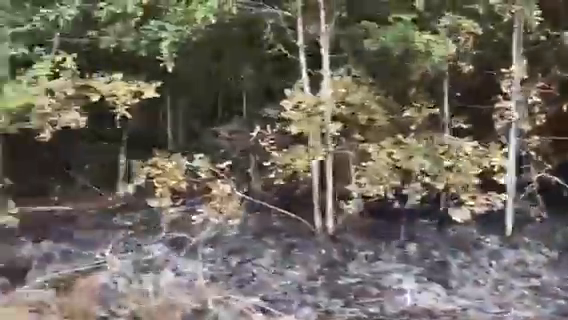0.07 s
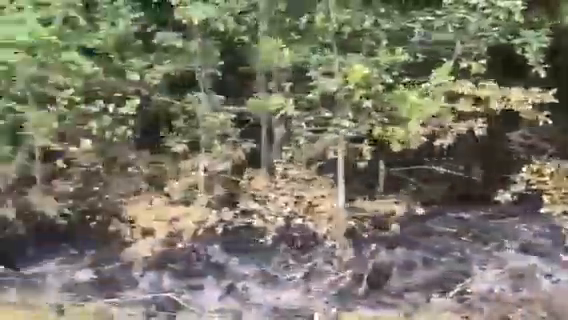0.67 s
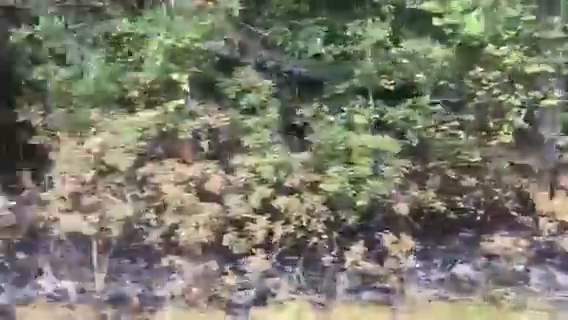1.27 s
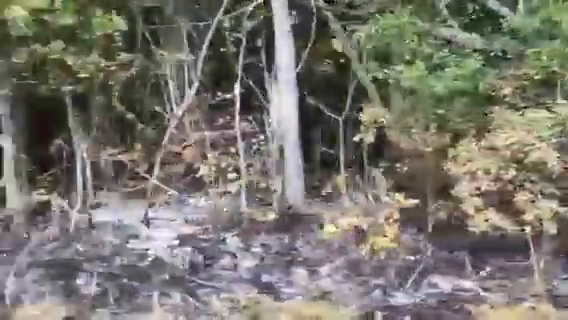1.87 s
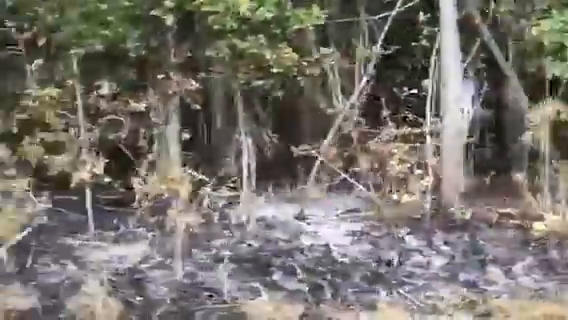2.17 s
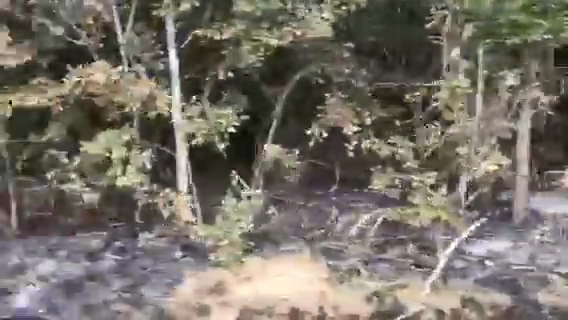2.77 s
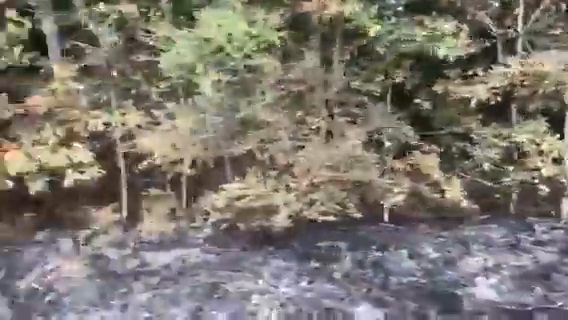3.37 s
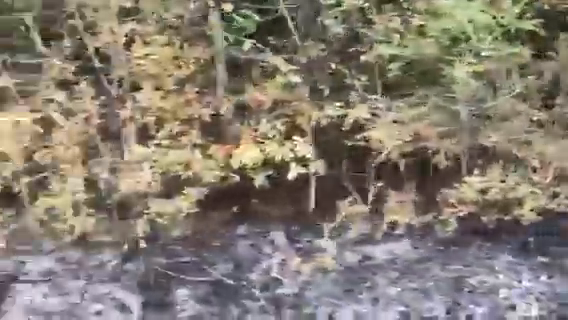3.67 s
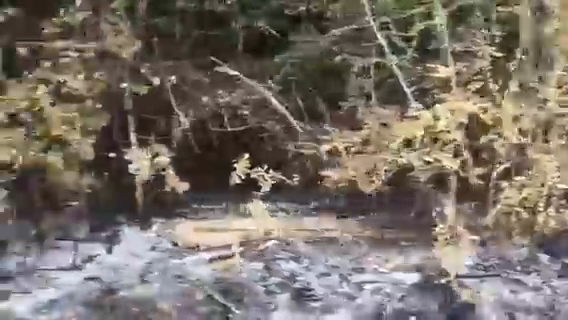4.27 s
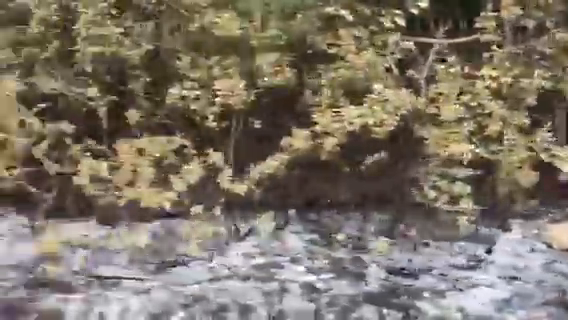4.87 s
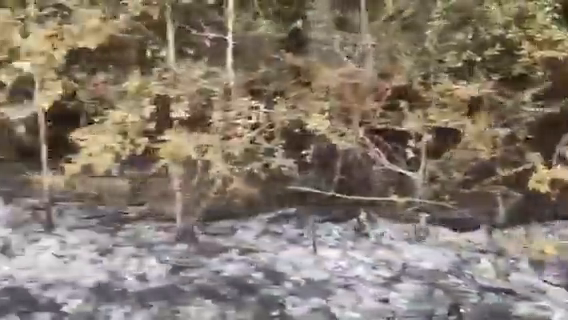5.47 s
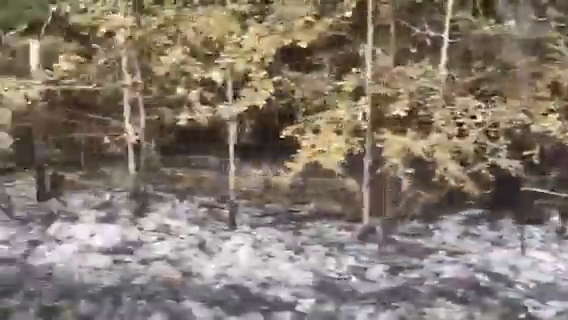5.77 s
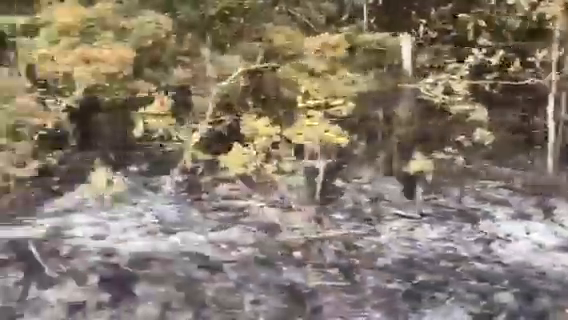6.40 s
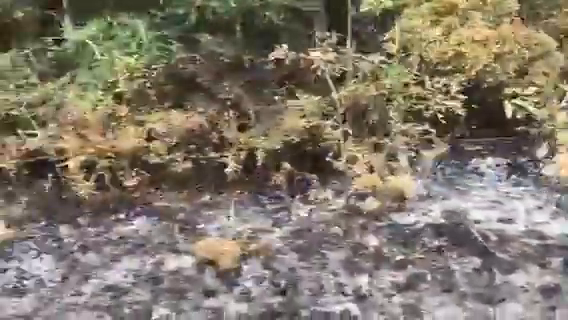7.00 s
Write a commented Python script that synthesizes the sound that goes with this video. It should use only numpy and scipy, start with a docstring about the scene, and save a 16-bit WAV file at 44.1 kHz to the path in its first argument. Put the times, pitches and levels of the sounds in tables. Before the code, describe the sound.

For about seven seconds we are inside a moving vehicle, the microphone beside an open side window. A deep road rumble and a steady rush of tyres and air run from start to finish, with slipstream throbbing unevenly in the cabin. The engine gains a little speed over the first two seconds, then eases into a low, booming drone. Gusts hit the microphone with dull thumps, in a strong cluster between 0.5 and 1 second, again near 1.7, and several times from 2.3 to 3.2 seconds. Around 2.4 seconds something softly brushes the microphone. The wind dips briefly at 4 seconds, swells at about 4.4, and thumps repeatedly from 5 to 6.2 seconds before easing off near the end. A faint, steady electric whine and a thin, high hiss of air at the window edge stay in the background throughout.

```python
"""Inside a vehicle rolling past woodland, with a side window open.
The engine gains a little speed and settles into a low drone, its firing pulses booming in the cabin.
Under it the road rumbles and gusts pump the cabin air; tyres and wind rush in through the window.
Eddies thump on the microphone, something briefly brushes past it, and a faint electric whine holds steady.
"""
import sys
import numpy as np
from scipy import signal
from scipy.fft import rfft, irfft
from scipy.io import wavfile
from scipy.ndimage import uniform_filter1d

SR = 44100
rng = np.random.default_rng(int(sys.argv[2]) if len(sys.argv) > 2 else 0)


def log_audio(samples):
    """Write samples as a 16-bit WAV file to the path given in sys.argv[1]."""
    # one column per channel
    frames = np.atleast_2d(samples).T
    # limit to full scale, then quantise
    limited = np.clip(frames, -1, 1)
    pcm = np.round(limited * 32767).astype(np.int16)
    wavfile.write(sys.argv[1], SR, pcm)


N = 314874
TIME, BINS = np.arange(N) / SR, np.fft.rfftfreq(N, 1 / SR)

# upper engine orders (multiple of the firing rate, level [dB])
ENGINE_ORDERS = [(3, -48.5), (4, -52.5), (5, -55)]
# tone of the road rumble (frequency [Hz], relative level [dB])
RUMBLE_EQ = [(25, -51), (45, -2.5), (62, 2.5), (78, 0.5), (102, 2.5), (135, -6), (185, -9.5), (255, -19.5),
             (350, -21), (470, -31.5), (800, -54.5), (2000, -90)]
# tyre growl as the road surface changes (time [s], lift [dB])
ROAD_SURFACE = [(0, 0.5), (1.2, -1.5), (1.8, 0), (2.1, 2.5), (3.3, 0.5), (3.75, -1), (4.4, 1), (4.8, -1),
                (5.3, -2), (5.6, 0), (6.4, 1), (7.14, -2.5)]
# slipstream turbulence at the open window (time [s], lift [dB])
SLIPSTREAM = [(0, -4), (.4, -1.5), (1.2, 0), (2.7, 0.5), (3.5, 1), (4.0, -5), (4.4, 3.5), (4.8, 0.5),
              (5.3, .5), (6.05, 2.5), (6.5, -5), (7.14, -4)]
# gusts and lulls (time [s], length [s], lift [dB])
GUSTS_AND_LULLS = [(.05, 0.045, -7), (.2, .04, 8), (.3, 0.017, -19), (.42, 0.091, -5), (.56, 0.15, 8),
                   (.81, 0.05, -16), (.92, 0.043, 15), (2.95, 0.11, 4.5), (3.14, 0.036, -11),
                   (3.22, 0.045, 10), (3.35, 0.088, -4), (3.5, 0.037, 3), (4.15, 0.1, 7),
                   (4.56, 0.049, 5.5), (4.76, 0.021, -6), (4.92, 0.13, -10), (5.07, 0.093, 3.5),
                   (7.1, 0.026, -18)]
# tone of the deep cabin surges (frequency [Hz], relative level [dB])
BUFFET_EQ = [(12, -30), (21, -12), (26, 2.5), (30, 5.5), (36, 4.5), (45, 10.5), (62, 0), (78, -14),
             (140, -22), (400, -105)]
# tone of the tyres and air (frequency [Hz], relative level [dB])
RUSH_EQ = [(100, 0), (350, -3.5), (600, 1), (720, -2.5), (1050, -1.5), (1800, -6.5), (2800, -12),
           (3300, -12.5), (4400, -16.5), (4900, -14.5), (5600, -20), (9000, -23), (10300, -25.5),
           (15700, -31)]
# resonances and notches in the rush (frequency [Hz], width [Hz], lift [dB])
RUSH_RESONANCES = [(925, 41, 4.5), (1194, 37, -6), (2800, 41, -4.5), (4926, 380, -6.5), (10500, 690, -4.5)]
# swells of the tyre roar (time [s], length [s], lift [dB])
ROAR_SWELLS = [(.5, .18, 0), (1.05, 0.16, 0.3), (2.1, 1, .5), (2.9, 0.18, 1), (4.76, 0.074, 0.7),
               (4.92, 0.19, 2), (5.5, 0.52, 1.2), (6.72, .12, -0.5)]
# strong eddies (time [s], push level [dB], push pitch [Hz], flap level [dB], flap pitch [Hz], wake [dB])
STRONG_EDDIES = [(.072, -33, 120, -29.5, 278, -45), (0.521, -22.5, 91, -46, 260, -60),
                 (.668, -20, 90, -30, 350, -42), (.731, -29, 150, -24, 385, -39.5),
                 (0.89, -20.5, 100, -32, 240, -52), (0.927, -15.5, 120, -24.5, 390, -40),
                 (.951, -26, 120, -28, 380, -47), (1.679, -20, 120, -30.5, 250, -47),
                 (2.307, -25.5, 152, -26.5, 345, -47), (2.467, -19.5, 125, -35, 258, -57),
                 (2.923, -21, 129, -34, 218, -51), (3.026, -34, 120, -35, 400, -48),
                 (3.18, -32, 150, -40, 240, -52), (4.325, -28, 131, -31, 290, -59),
                 (4.43, -33, 120, -39, 400, -50), (4.876, -27, 140, -27, 237, -56),
                 (5.098, -16.5, 79, -33, 426, -64), (5.499, -20.5, 130, -34, 268, -57),
                 (5.573, -22, 119, -35, 398, -49), (5.887, -20.5, 148, -31, 268, -53),
                 (6.032, -17.5, 101, -29, 318, -58), (6.1879, -15, 120, -29.5, 585, -52)]
# tone of an eddy's wake (frequency [Hz], relative level [dB])
WAKE_EQ = [(120, -26), (250, 11), (520, -11), (750, -13), (1500, -27), (4000, -70)]
# soft scuffs (time [s], length [s], level [dB], resonance [Hz], resonance lift [dB])
SCUFFS = [(2.355, 0.033, -54, 4150, 15), (2.375, .012, -56, 8000, 9), (2.451, 0.012, -57, 6200, 6)]
# tone of a scuff (frequency [Hz], relative level [dB])
SCUFF_EQ = [(2000, -28), (3300, 4), (4100, -4), (5000, 0), (8000, -3), (12000, -14), (16000, -13)]
# electric motor partials (multiple of the fundamental, level [dB])
WHINE_PARTIALS = [(1, -58), (2, -68.5), (3, -80), (4, -75), (6, -71)]
# flares of the thin hiss (time [s], length [s], lift [dB])
HISS_FLARES = [(.145, 0.027, 7), (.63, .08, -4), (.89, 0.054, 4), (2.2, .5, 2), (2.448, .02, 8),
               (5.2, .35, 2)]
# tone of the narrow hiss at the window edge (frequency [Hz], relative level [dB])
SIBILANT_EQ = [(6000, -40), (7200, -13.5), (7750, -6), (8250, -3), (8700, -10), (9600, -29), (10500, -39)]
# fader ride of that narrow hiss (time [s], level [dB])
SIBILANT_RIDE = [(0, -67.5), (1.1, -71), (1.8, -69), (2.15, -67), (2.7, -68.5), (3.2, -67.5), (4.05, -67.5),
                 (4.8, -68), (5.4, -67.5), (6, -68.5), (6.4, -67.8), (7.14, -66.5)]
# window gap resonances (frequency [Hz], width [Hz], peak level [dB], peak time [s], length [s])
GAP_RESONANCES = [(10700, 340, -80.5, 2.2, 3.0), (11520, 300, -85, 2.3, 6.5)]

START_HZ, CRUISE_HZ, SETTLE_S = 40.2, 46.49, 2.1  # engine firing rate
BOOM_HZ, BOOM_WIDTH_HZ = 49.2, 13.7  # cabin resonance
DRONE_DB, DRONE_SWELL_DB_PER_S = -32.5, 0.47  # ahead of the cabin resonance
OCTAVE_DB, LOAD_LIFT_DB, THROTTLE_EASE_S = -48, 10.5, 2.05
ROAD_DB, BUFFET_DB, HISS_DB = -33.5, -36, -78  # base levels
RUSH_DB, RUSH_FADE_DB_PER_S = -49.5, 0.13
GROWL_ABOVE_HZ, ROAR_BELOW_HZ = 118, 2600  # crossovers
THROB_DB, THROB_PER_S = 1.5, 27  # irregular pulsing of the slipstream
# share of a gust's lift that each layer takes
DRONE_GUST_SHARE, BOTTOM_GUST_SHARE, GROWL_GUST_SHARE, BUFFET_GUST_SHARE = 0.61, 0.71, 0.24, 0.83
WAKE_S, WAKE_LEAD_S = 0.013, 0.0014  # the wake peaks just ahead of its eddy
WHINE_HZ, SCUFF_WIDTH_HZ, HIGH_CUT_HZ = 316.7, 450, 15720


def engine(gust_db):
    """The drone grows as the firing rate nears the cabin's boom; its octave drops as the load eases."""
    firing_hz = START_HZ + (CRUISE_HZ - START_HZ) * np.tanh(TIME / SETTLE_S)
    turns = np.cumsum(firing_hz * (1 + 0.0034 * drift(rate=4.3))) / SR
    cabin_gain = 1 / (1 + (2 * (firing_hz - BOOM_HZ) / BOOM_WIDTH_HZ) ** 2)
    drone = amp(DRONE_DB + DRONE_SWELL_DB_PER_S * TIME) * cabin_gain * tone(turns)
    load = .5 - .5 * np.tanh(2 * (TIME - THROTTLE_EASE_S))
    octave = amp(OCTAVE_DB + LOAD_LIFT_DB * load) * tone(2 * turns)
    upper = sum(amp(db + 0.66 * drift(rate=4.3)) * tone(k * turns) for k, db in ENGINE_ORDERS)
    flutter = amp(DRONE_GUST_SHARE * gust_db + 0.52 * drift(rate=2.6))
    return (drone + octave) * flutter + upper


def road(turbulence_db, gust_db):
    """Wind and road rumble: the bottom end rides the turbulence, the growl rides the road surface."""
    rumble = steady(noise(contour(RUMBLE_EQ)))
    bottom = lowpass(rumble, GROWL_ABOVE_HZ, slope=8)
    growl = amp(follow(ROAD_SURFACE) + GROWL_GUST_SHARE * gust_db) * (rumble - bottom)
    return amp(ROAD_DB) * (amp(turbulence_db + BOTTOM_GUST_SHARE * gust_db) * bottom + growl)


def buffet(turbulence_db, gust_db):
    """Gusts at the open window pump the cabin air in deep surges."""
    return amp(BUFFET_DB + turbulence_db + BUFFET_GUST_SHARE * gust_db) * steady(noise(contour(BUFFET_EQ)))


def rush():
    """Tyre roar and air hiss through the window, fluttering a little in the slipstream."""
    air = noise(contour(RUSH_EQ) + sum(bell(hz, width, db) for hz, width, db in RUSH_RESONANCES))
    roar = lowpass(air, ROAR_BELOW_HZ, slope=4)
    level_db = RUSH_DB - RUSH_FADE_DB_PER_S * TIME + 0.43 * drift(rate=20)
    return amp(level_db) * (air - roar + amp(humps(ROAR_SWELLS)) * roar)


def eddies():
    """Each eddy gives a slow push, a quicker flap and a ragged wake as it crosses the microphone."""
    out, wake_noise = np.zeros(N), noise(contour(WAKE_EQ))
    for s, push_db, push_hz, flap_db, flap_hz, wake_db in STRONG_EDDIES + weak_eddies():
        near = abs(TIME - s) < .04
        t = TIME[near] - s
        push = amp(push_db) * puff(t - .003, push_hz, cycles=0.47)
        flap = amp(flap_db) * puff(t, flap_hz, cycles=0.61)
        wake = amp(wake_db) * np.exp(-(2 * (t + WAKE_LEAD_S) / WAKE_S) ** 2) * wake_noise[near]
        out[near] += push + flap + wake
    return out


def weak_eddies(per_s=3.2, push_db=-27.5, push_hz=117, flap_db=-37, flap_hz=257, wake_db=-51):
    """Light thumps, random in time and flap pitch, as rows like those of STRONG_EDDIES."""
    times = TIME[rng.random(N) < per_s / SR]
    pitches = flap_hz * 2 ** (0.25 * rng.standard_normal(len(times)))
    return [(s, push_db, push_hz, flap_db, hz, wake_db) for s, hz in zip(times, pitches)]


def scuffs():
    """Something brushes the microphone, each soft touch with its own scraping resonance."""
    return sum(humps([(s, length, amp(db))]) * noise(contour(SCUFF_EQ) + bell(hz, SCUFF_WIDTH_HZ, lift_db))
               for s, length, db, hz, lift_db in SCUFFS)


def whine():
    """A small electric motor sings faintly at a near-constant speed."""
    turns = np.cumsum(WHINE_HZ * (1 + 0.00093 * drift(rate=8.7))) / SR
    return sum(amp(db + drift(rate=3.8)) * tone(k * turns) for k, db in WHINE_PARTIALS)


def edge_hiss():
    """Air over the window edge: a thin, gusty hiss and a narrow sibilant band."""
    thin_eq = contour([(2500, -30), (5000, 6), (11000, 7), (15700, 2)])
    thin = amp(HISS_DB + humps(HISS_FLARES) + 1.7 * drift(rate=11)) * noise(thin_eq)
    sibilant = amp(follow(SIBILANT_RIDE) + 0.42 * drift(rate=17)) * noise(contour(SIBILANT_EQ))
    return thin + sibilant


def gap_sizzle():
    """Airflow excites faint, high resonances in the window gap that slowly come and go."""
    out = np.zeros(N)
    for hz, width, db, s, length in GAP_RESONANCES:
        resonance_db = -20 * np.log10(1 + (2 * (BINS - hz) / width) ** 2)
        out += humps([(s, length, amp(db))]) * noise(resonance_db)
    return out


def amp(db):
    """Decibels to gain."""
    return 10 ** (np.asarray(db) / 20)


def unit(x):
    """Scales to rms 1."""
    return x / np.sqrt(np.mean(x ** 2) + 1e-20)


def follow(rows):
    """A fader ride through (time [s], level [dB]) points."""
    return np.interp(TIME, *np.transpose(rows))


def humps(rows):
    """A smooth rise and fall for each (time [s], length [s], height), summed."""
    return sum(height * np.exp(-(2 * (TIME - s) / length) ** 2) for s, length, height in rows)


def contour(points):
    """An EQ curve in dB, joined on a log-frequency axis."""
    hz, db = np.transpose(points)
    return np.interp(np.log(BINS + 1), np.log(hz), db)


def bell(hz, width, db):
    """A bell-shaped EQ boost or cut in dB."""
    return db * np.exp(-2 * ((BINS - hz) / width) ** 2)


def lowpass(x, hz, slope):
    """Rolls off the top by 6 dB an octave for each step of slope."""
    return irfft(rfft(x) / (1 + (BINS / hz) ** slope), N)


def noise(eq_db):
    """Noise of rms 1 with the given colour."""
    return unit(irfft(rfft(rng.standard_normal(N)) * amp(eq_db), N))


def steady(x):
    """Evens out the slow swells of a noise and keeps its fast grain."""
    return x / np.sqrt(uniform_filter1d(x ** 2, size=4000) + 1e-9)


def drift(rate):
    """Random wobble of rms 1, up to about rate cycles a second."""
    return unit(irfft(rfft(rng.standard_normal(N)) * np.exp(-(BINS / rate) ** 2) * (BINS > 0), N))


def tone(turns):
    """A sine of rms 1 that starts anywhere in its cycle."""
    return np.sqrt(2) * np.sin(2 * np.pi * (turns + rng.random()))


def puff(t, hz, cycles):
    """One swing of air pressure with a small rebound."""
    return np.exp(-(t * hz / cycles) ** 2) * np.sin(2 * np.pi * hz * t)


def scene():
    """The mono mix at the window seat; the same gusts move the drone, the rumble and the surges."""
    turbulence_db = follow(SLIPSTREAM)
    gust_db = humps(GUSTS_AND_LULLS) + THROB_DB * drift(rate=THROB_PER_S)
    low_bed = road(turbulence_db, gust_db) + buffet(turbulence_db, gust_db)
    mix = engine(gust_db) + whine() + low_bed + rush() + edge_hiss() + gap_sizzle() + scuffs() + eddies()
    return mix[None]


def record(dry):
    """Click-free 2 ms fades at both ends, then a steep high cut."""
    fades = np.minimum(np.minimum(TIME, TIME[-1] - TIME) / .002, 1)
    high_cut = signal.firwin(1023, HIGH_CUT_HZ, window=("kaiser", 9), fs=SR)
    return signal.oaconvolve(dry * fades, high_cut[None], "same")


dry = scene()
out = record(dry)
log_audio(out)
```